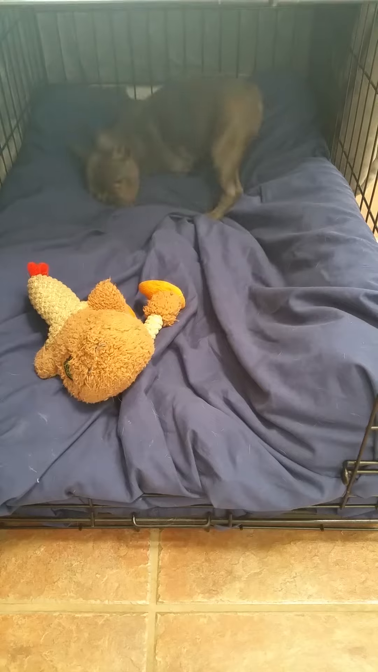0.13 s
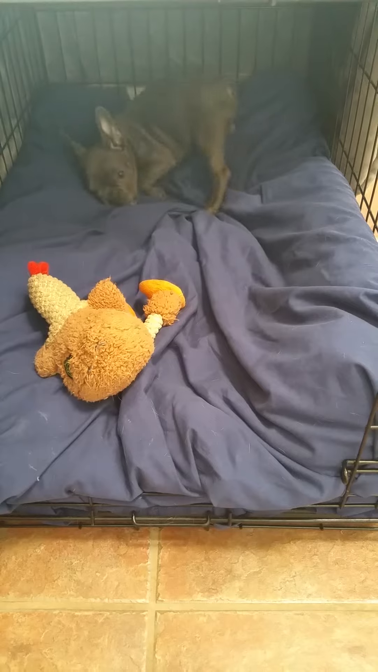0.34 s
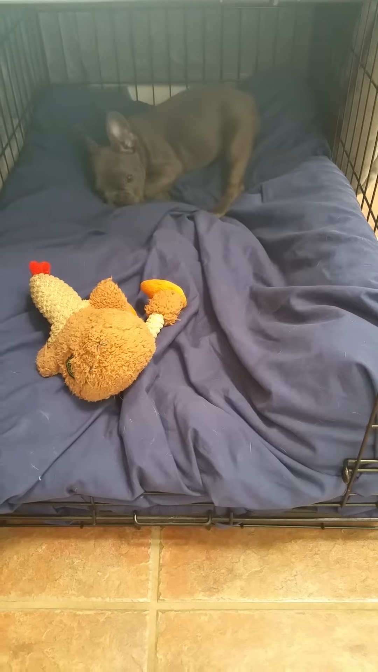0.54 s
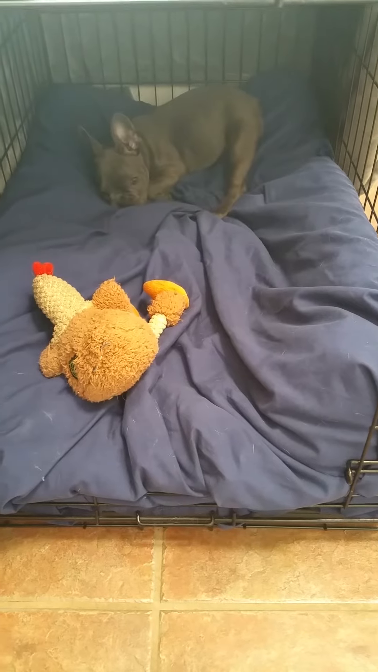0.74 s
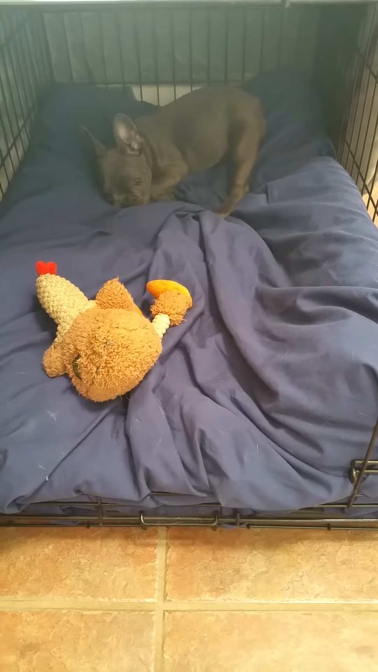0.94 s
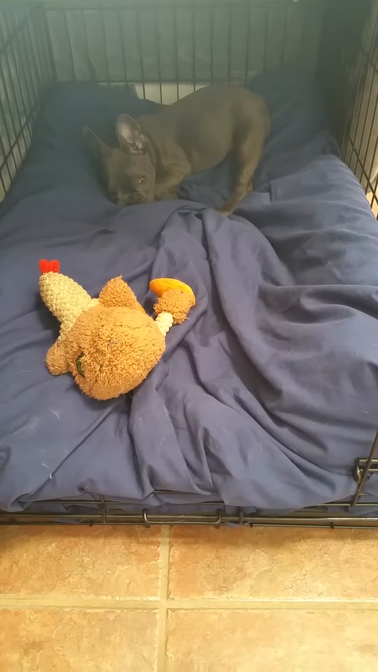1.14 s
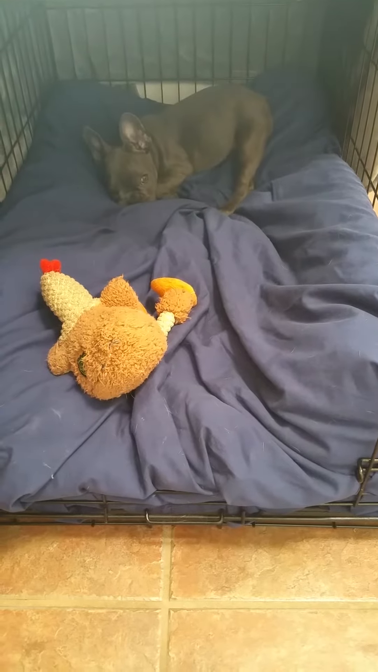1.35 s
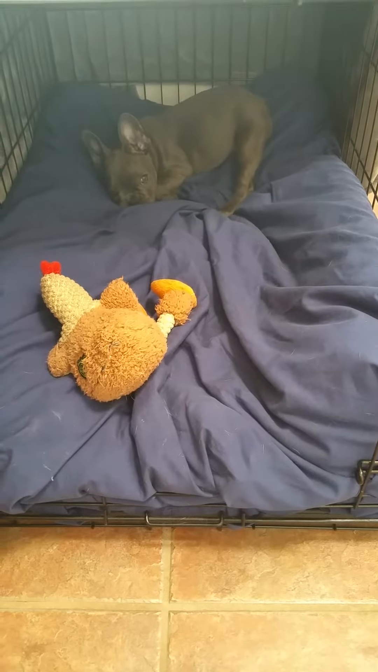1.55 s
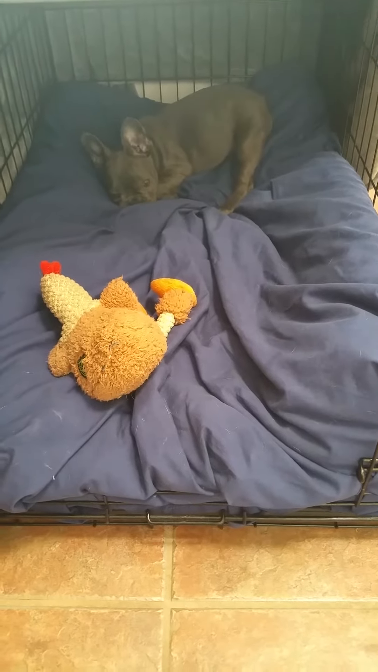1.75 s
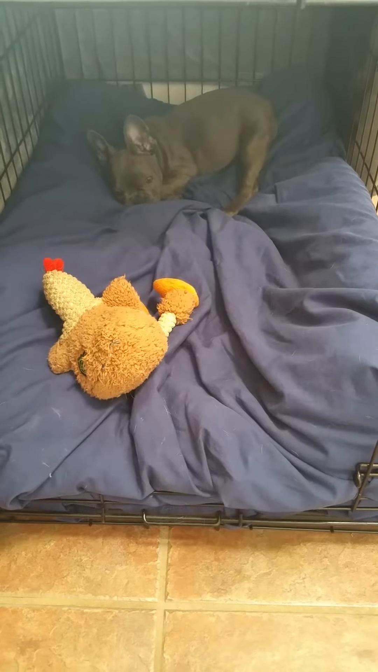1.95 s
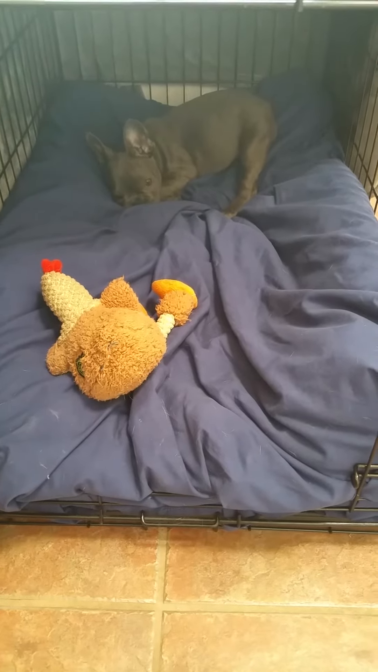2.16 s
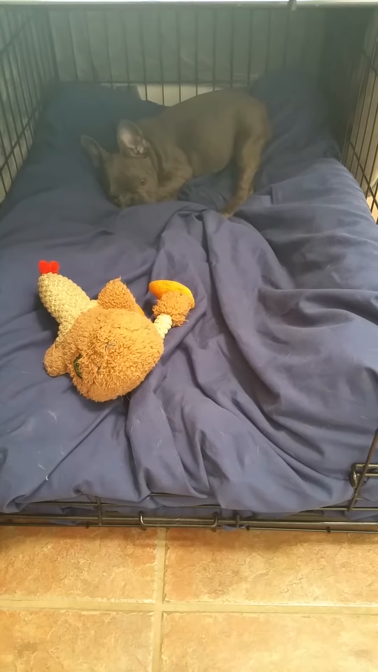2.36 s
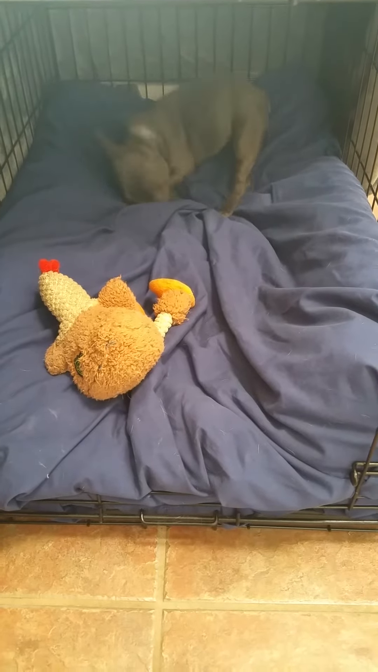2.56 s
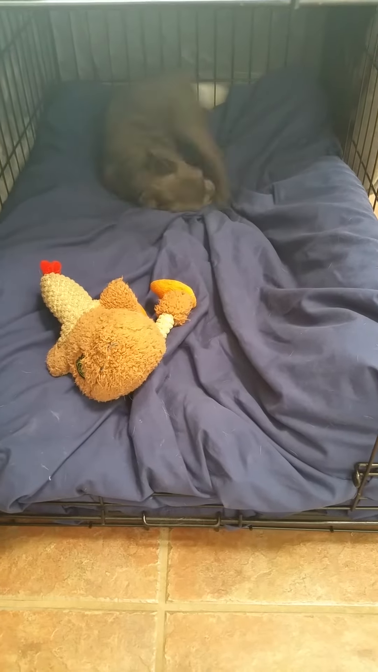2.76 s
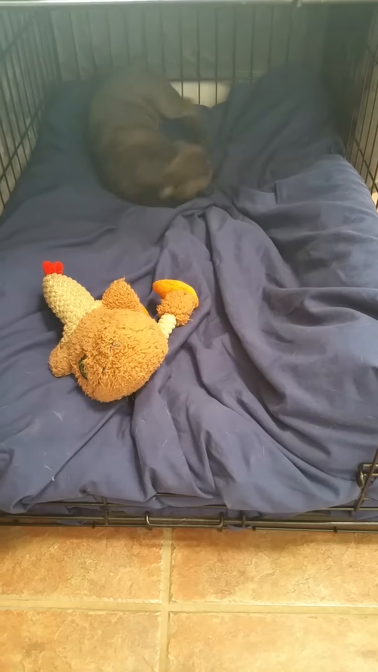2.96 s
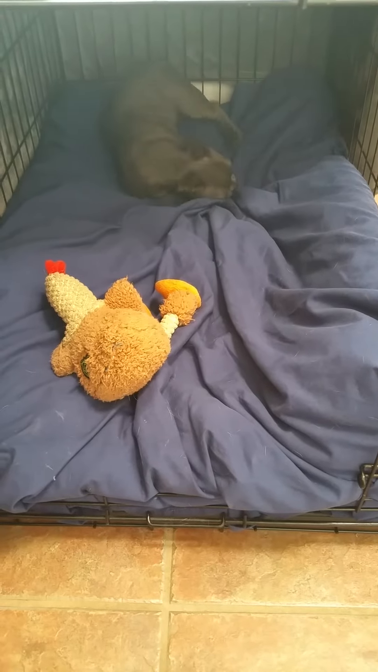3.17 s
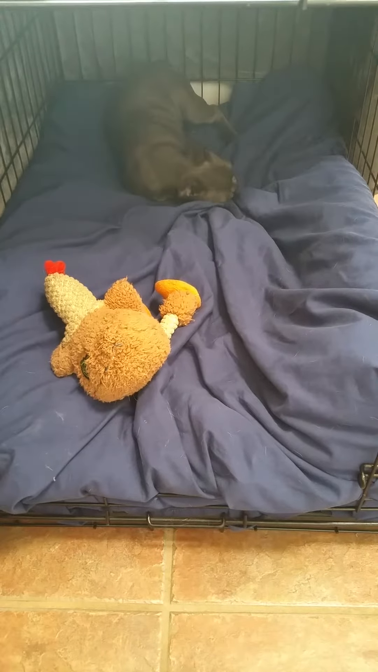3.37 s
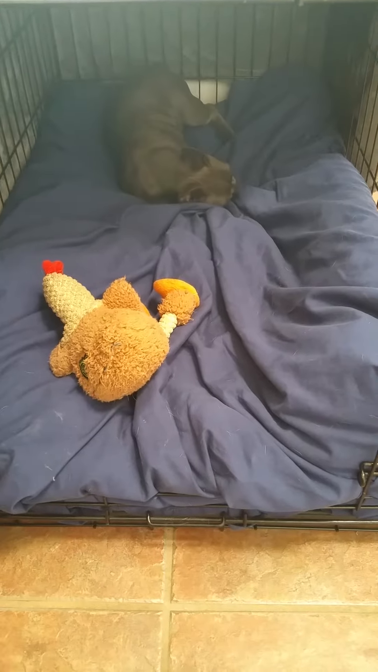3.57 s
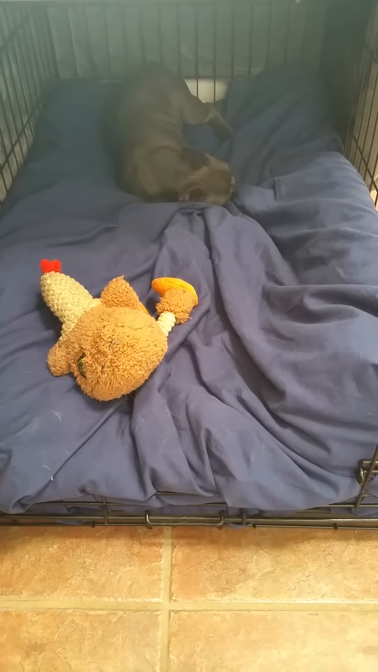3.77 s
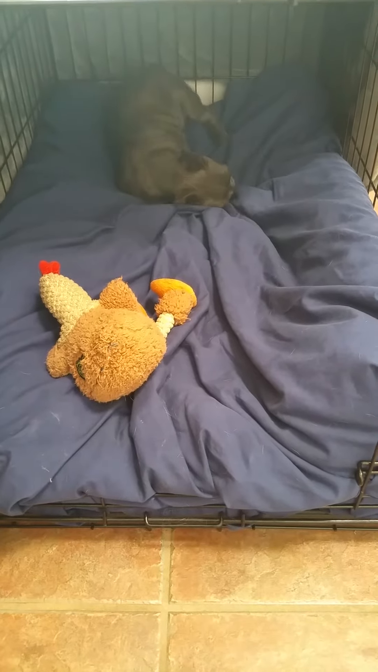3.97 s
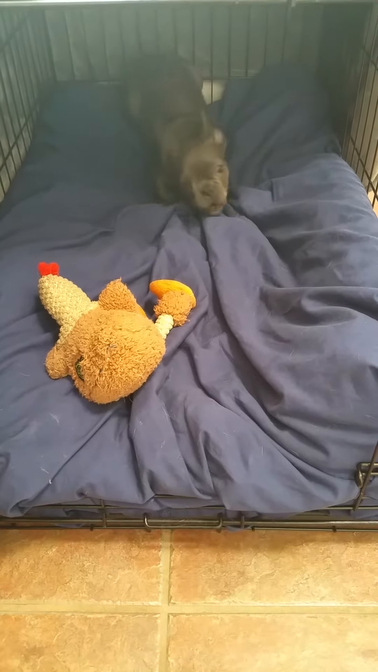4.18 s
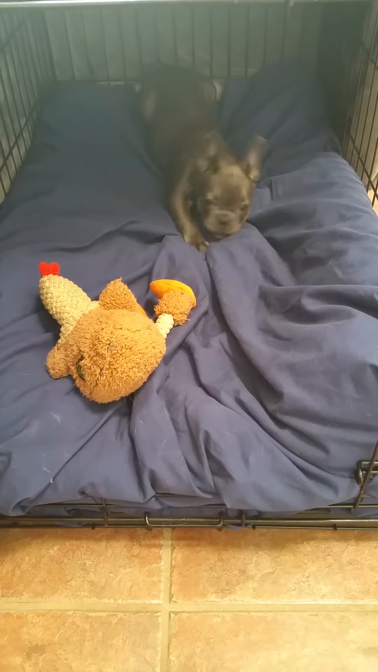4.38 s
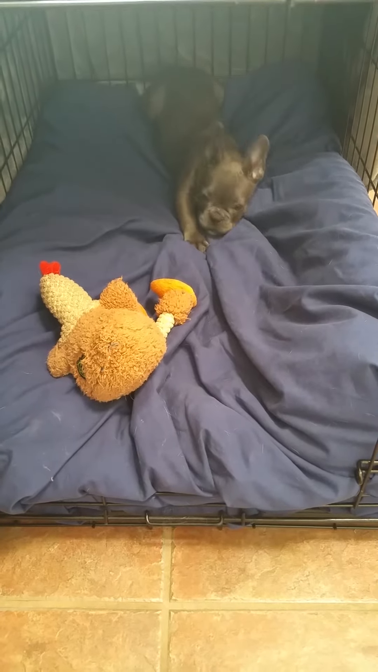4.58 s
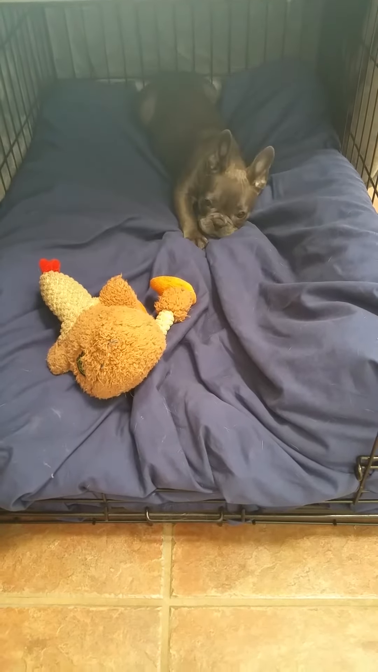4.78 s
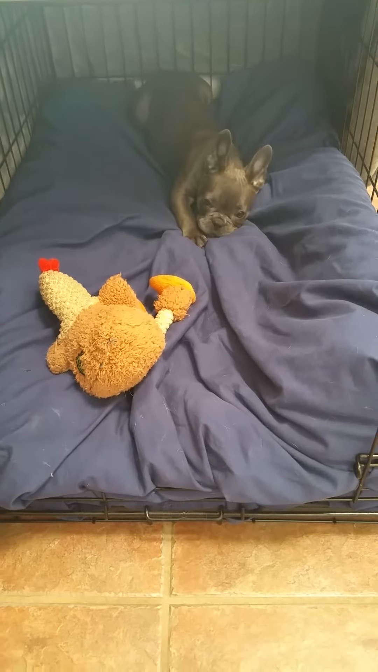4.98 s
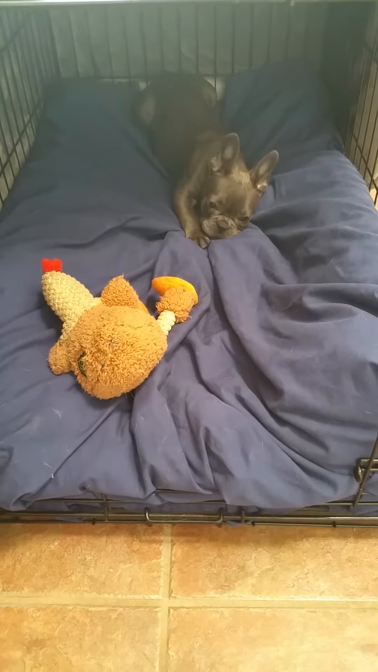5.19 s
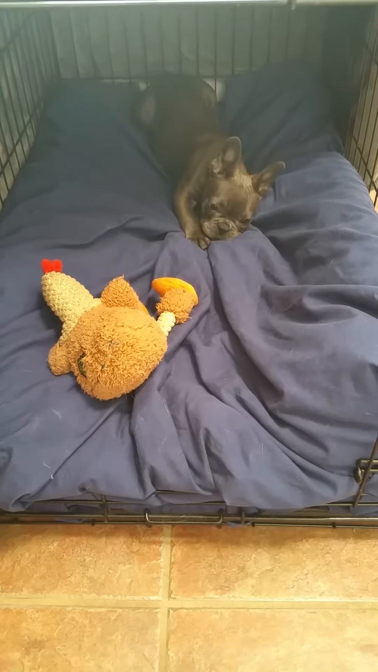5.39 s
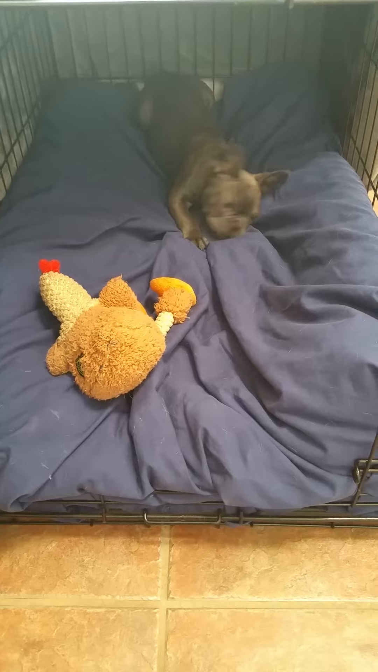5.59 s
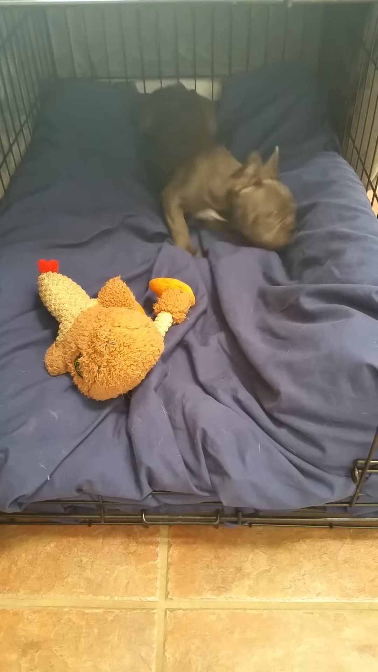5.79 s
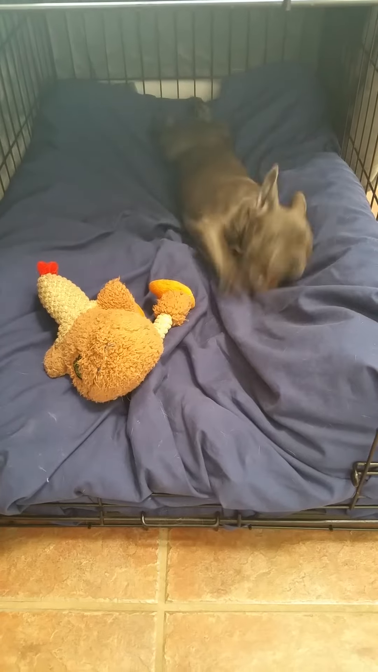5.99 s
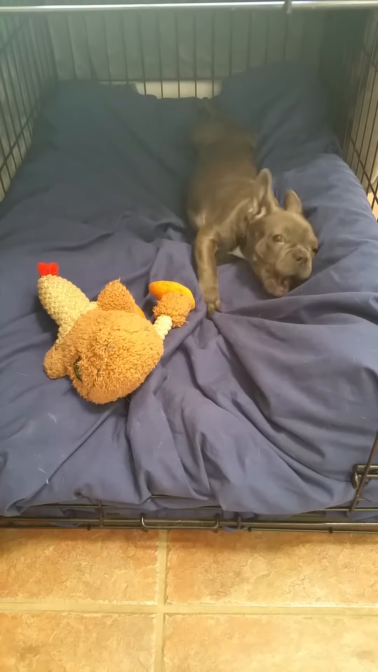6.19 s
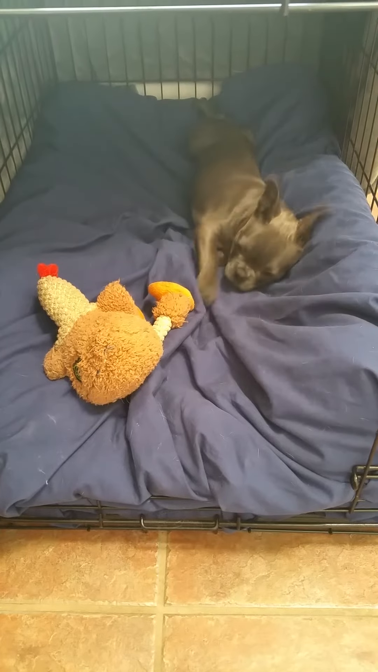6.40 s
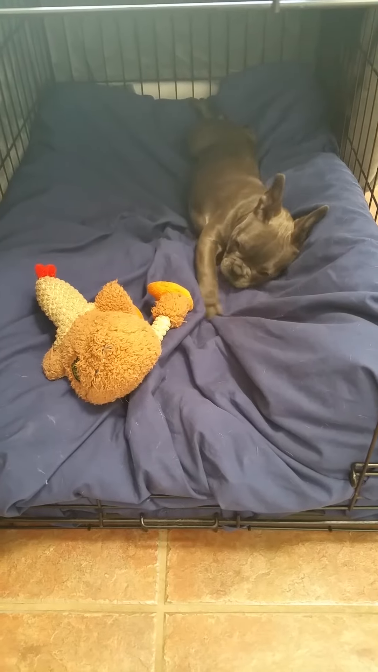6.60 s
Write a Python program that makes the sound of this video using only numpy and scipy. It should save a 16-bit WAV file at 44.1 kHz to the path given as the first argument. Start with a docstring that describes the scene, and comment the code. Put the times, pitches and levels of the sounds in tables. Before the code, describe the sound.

A small dog moves on a blanket in a wire crate, fairly close to the microphone in a reflective tiled room. Quiet room air, faint low hum and a barely audible thin whine lie beneath. At 0.1 s a firm padded thump lands with cloth slap, followed by lighter thuds and dragging fabric until about 0.4 s. Then it is nearly still: faint rustles and scrapes around 1.15 s, a small tick at 2.05 s. At 2.5 s comes a short, loud, hoarse bark, rising quickly and cutting off into a brief room ring. Soft paw thuds and rustles follow at 2.75-3.3 s. A second raspy bark, slightly thinner, hits at 4.13 s, with a landing at 4.4 s. After a lull, a sharp click at 5.7 s leads into pawing, muffled thumps, grainy scrapes and bright cloth swishes until 6.3 s, ending in faint shuffles.

```python
"""A small dog turns about on a blanket in a wire crate, in a tiled room, over air, mains hum and a thin whine.
It pounces and shifts: landings ring the cushioned tray, noise drags as cloth, and small clicks tick.
Two hoarse barks follow, rough vocal pulses and air through throat and mouth, ringing in the room.
Between and after them it paws and burrows: more thuds, rustles, grainy scrapes and bright swishes."""
import sys
import numpy as np
from scipy import signal
from scipy.fft import rfft, irfft, next_fast_len
from scipy.io import wavfile
from scipy.ndimage import uniform_filter1d, minimum_filter1d

SR = 44100
rng = np.random.default_rng(int(sys.argv[2]) if len(sys.argv) > 2 else 0)


def persist_wave(psi):
    """Save psi, clipped to +-1, as 16-bit WAV."""
    counts = np.round(np.clip(psi, -1, 1) * 32767).astype(np.int16)
    wavfile.write(sys.argv[1], SR, np.atleast_2d(counts).T)


N = 293265
TIME = np.arange(N) / SR

# Paws and body landing on the padded floor.
# Each row: start in seconds, relative thud level in dB, relative cloth slap level in dB.
LANDINGS = [(0.112, -17.5, -18.5), (0.129, -32.5, -34), (0.18, -32.5, -53), (0.358, -44, -53),
            (2.757, -37.5, -56), (2.789, -39, -54), (2.823, -40, -42), (2.885, -38, -46), (3.139, -46, -62),
            (3.182, -47, -58), (3.245, -45, -64), (4.368, -32.5, -54.5), (4.390, -29.5, -27),
            (4.401, -30.5, -34), (5.756, -40, -53), (5.836, -32.5, -39.5), (5.96, -34.5, -40),
            (5.988, -33.5, -42), (6.088, -38.5, -63), (6.121, -34.5, -38), (6.141, -43, -35),
            (6.424, -47, -56), (6.603, -45, -54.5)]
# Dull colour of shuffling padding and of chest air. Each row: frequency in Hz, relative level in dB.
DULL_COLOUR = [(40, 11.5), (90, -16.5), (200, 0.5), (320, -16), (600, -11), (1500, -45.5)]


def from_db(db):
    """Decibels to gain."""
    return 10 ** (np.asarray(db) / 20)


def rms_one(x):
    """Scale to unit power."""
    return x / np.sqrt(np.mean(x ** 2) + 1e-20)


def in_time(rows):
    """Columns of a curve at every sample."""
    s, *columns = np.transpose(rows)
    return [np.interp(TIME, s, column) for column in columns]


def at_hz(points, hz, axis=1):
    """Read one column of a spectrum on a log-frequency axis."""
    points = np.array(points)
    return np.interp(np.log(hz + 1e-9), np.log(points[:, 0]), points[:, axis])


def colour(x, spectrum, power=1):
    """Give a signal a smooth spectrum; power scales its decibels."""
    size = next_fast_len(N + 4096)
    gain = from_db(power * at_hz(spectrum, np.fft.rfftfreq(size, 1 / SR)))
    return irfft(rfft(x, size) * gain, size)[..., :N]


def cut(x, hz, side):
    """Steep high- or low-pass."""
    return signal.sosfilt(signal.butter(4, hz, side, fs=SR, output="sos"), x)


def drift(rate):
    """Random wander: straight lines between normal draws, rate draws per second."""
    knots = rng.standard_normal(N // 8)
    return np.interp(TIME * rate, np.arange(len(knots)), knots)


def swell(s, length_s, attack_s, fade_s):
    """An envelope that rises, holds to the end of its length and dies away."""
    age = TIME - s
    return np.clip(age / attack_s, 0, 1) * np.exp(-np.clip((age - length_s) / fade_s, 0, 30))


def diffuse(size):
    """Stereo noise from all around: alike in the bass, unrelated in the treble."""
    # Each row: frequency in Hz, left-right likeness from 0 to 1.
    likeness = [(60, 0.9), (170, 0.88), (300, 0.5), (600, 0.93), (1300, 0), (3000, 0), (15000, 0)]
    padded = next_fast_len(size)
    mid, side = rfft(rng.standard_normal((2, padded)))
    alike = np.clip(at_hz(likeness, np.linspace(0, SR / 2, len(mid))), -1, 1)
    spread = np.sqrt(1 - alike) * side * [[1], [-1]]
    return rms_one(irfft(np.sqrt(1 + alike) * mid + spread, padded)[:, :size])


def resonance(hz, width_hz):
    """Two-pole band-pass with gain one on top."""
    r = np.exp(-np.pi * width_hz / SR)
    return (1 - r * r) / 2 * np.array([1, 0, -1]), [1, -2 * r * np.cos(2 * np.pi * hz / SR), r * r]


def resonate_twice(x, hz, width_hz):
    """Two equal band-passes in a row: a narrower peak with steeper skirts."""
    b, a = resonance(hz, width_hz)
    return signal.lfilter(b, a, signal.lfilter(b, a, x))


def ring(x, hz, t60):
    """A unit click sets a sine of height one ringing, 60 dB down after t60 seconds."""
    r, w = np.exp(-np.log(1000) / (t60 * SR)), 2 * np.pi * hz / SR
    return signal.lfilter([0, np.sin(w)], [1, -2 * r * np.cos(w), r * r], x + 1e-18)


def add(track, s, sound):
    """Lay a sound into a track at a given time."""
    start = int(s * SR)
    track[start:start + len(sound)] += sound[:N - start]


def background(air_db, whine_hz, whine_width_hz):
    """Coloured noise for room air, slowly wavering sines for hum, narrow noise for a whine that comes and goes."""
    # Room air. Each row: frequency in Hz, relative level in dB.
    air_colour = [(20, -12.5), (50, -16.5), (100, -9.5), (200, -18), (400, -22), (800, -27.5), (2000, -30),
                  (5000, -37), (10000, -35), (15500, -34)]
    # Mains hum. Each row: frequency in Hz, level in dB before the slow waver.
    hum_tones = [(119.6, -69), (240, -84.5)]
    # Spells of whine. Each row: start in seconds, length in seconds, level in dB before the flicker.
    whine_spells = [(1.914, 0.46, -79.5), (3.03, 0.51, -80), (5.171, 0.42, -75.5)]
    air = from_db(air_db) * rms_one(colour(diffuse(N), air_colour))
    hum = 0
    for hz, db in hum_tones:
        hum = hum + from_db(db) * np.sqrt(2) * np.sin(2 * np.pi * (hz * TIME + rng.random()))
    spells = sum(from_db(db) * swell(s, length_s, attack_s=0.17, fade_s=0.03) for s, length_s, db in whine_spells)
    whine_level = from_db(-91) + spells * from_db(2.5 * drift(20))   # faint idle tone, flickering spells
    whine = rms_one(resonate_twice(diffuse(N), whine_hz, whine_width_hz)) * whine_level
    return air + hum * from_db(.7 * drift(0.99)) + whine


def swishes():
    """Brief, even, bright hisses of coloured noise as the dog noses along the cloth."""
    # Each row: start in seconds, length in seconds, level in dB.
    swish_rows = [(1.17, 0.17, -68), (2.742, 0.04, -57.5), (6.109, 0.18, -53)]
    # Bright hiss. Each row: frequency in Hz, relative level in dB.
    swish_colour = [(530, -43), (900, -4), (1270, -6), (1500, -15.5), (1930, 3), (2100, -7.5), (3110, -4),
                    (5000, -13), (5370, -5), (6270, -1), (8050, -15.5), (12500, -8.5), (15500, -14)]
    level = sum(from_db(db) * swell(s, length_s, attack_s=0.045, fade_s=0.033) for s, length_s, db in swish_rows)
    return level * rms_one(colour(diffuse(N), swish_colour))


def cloth_motion():
    """Strength of rustle and shuffle: the dog's uneven moves, plus a short drag after each landing."""
    # The dog drags the cloth as it pounces, settles, shifts, turns and burrows. Each row: start in seconds,
    # length in seconds, fade in seconds, relative rustle level in dB, relative dull shuffle level in dB.
    moves = [(-0.02, 0.17, 0.043, -61, -51.5), (0.124, 0.086, 0.23, -54, -59),
             (0.33, 0.04, 0.025, -64, -59), (0.506, 0.055, 0.064, -66.5, -62),
             (1.134, 0.2, 0.13, -68.5, -69), (1.56, 1, 0.1, -73, -74.5), (3.038, 0.26, 0.078, -66, -67),
             (3.96, 0.21, 0.03, -64, -67.5), (5.473, 0.29, 0.1, -72, -77), (5.678, 0.14, 0.05, -58.5, -59),
             (5.809, 0.35, 0.21, -56, -52), (6.57, 0.078, 0.1, -68, -67)]
    drag_s, drag_rustle_db, drag_shuffle_db = 0.0065, -28, -20   # time to the drag's peak; levels under its thud
    rub_power, shuffle_power = 0, 0
    for s, length_s, fade_s, rustle_db, shuffle_db in moves:
        move = swell(s, length_s, 0.016, fade_s)
        rub_power = rub_power + (from_db(rustle_db) * move) ** 2
        shuffle_power = shuffle_power + (from_db(shuffle_db) * move) ** 2
    drags, age = np.zeros(N), TIME[:SR // 2] / drag_s
    for s, thud_db, _ in LANDINGS:
        add(drags, s, from_db(thud_db) * age * np.exp(1 - age))
    uneven = from_db(1 * drift(24))   # spread in dB; jerks per second
    rub = uneven * np.sqrt(rub_power) + from_db(drag_rustle_db) * drags
    shuffle = uneven * np.sqrt(shuffle_power) + from_db(drag_shuffle_db) * drags
    return rub, shuffle


def blanket(rustle_db, shuffle_db, grain_db, crackle_db, folds_per_s):
    """Fibres rub in clumps, small folds snap, and the padding shuffles beneath."""
    # Rubbing fibres. Each row: frequency in Hz, relative level in dB.
    rustle_colour = [(210, -52.5), (350, -12.5), (957, -13), (1040, -16.5), (1290, -13.5), (1490, -14),
                     (3480, -26), (6620, -30.5), (8520, -38), (15000, -46.5)]
    rub, shuffle = cloth_motion()
    snaps = (rng.random(N) < folds_per_s / SR) * rng.standard_normal((2, N))
    clumps = rms_one(diffuse(N) * from_db(grain_db * drift(130)))
    grains = clumps + from_db(crackle_db) * rms_one(snaps)
    rustling = from_db(rustle_db) * rub * rms_one(colour(grains, rustle_colour))
    padding = from_db(shuffle_db) * shuffle * rms_one(colour(diffuse(N), DULL_COLOUR))
    return rustling + padding


def scrapes(grain_db):
    """Grainy friction around one pitch that grips quickly, holds and lets go."""
    # Short rasps. Each row: start in seconds, length in seconds, relative level in dB, centre in Hz.
    scrape_rows = [(1.14, 0.057, -68, 590), (1.185, 0.21, -75.5, 2100), (2.042, 0.2, -68, 2300),
                   (2.06, 0.16, -72.5, 845), (3.194, 0.037, -68.5, 1373), (4.022, 0.082, -58.5, 1440),
                   (5.503, 0.089, -75, 1330), (5.719, 0.026, -61, 2720), (5.899, 0.02, -51, 3340),
                   (5.9, 0.032, -56, 1300), (6.006, 0.03, -57, 1790), (6.046, 0.027, -55.5, 1440)]
    out, friction = 0, rng.standard_normal(N) * from_db(grain_db * drift(230))
    for s, length_s, db, hz in scrape_rows:
        rub = rms_one(resonate_twice(friction, hz, width_hz=750))
        out = out + from_db(db) * rub * swell(s, length_s, attack_s=0.012, fade_s=0.012)
    return out


def ticks(t60, contact_s):
    """Short contacts of the crate and of claws, with a few quickly damped rings."""
    # Each row: start in seconds, relative peak level in dB, frequency of the click's own ring in Hz.
    tick_rows = [(1.142, -47.5, 520), (1.164, -54, 536), (1.934, -47.5, 865), (2.0618, -36.5, 750),
                 (5.135, -49, 1028), (5.6601, -43.5, 1163), (5.7124, -27.5, 1020), (6.465, -53.5, 828)]
    # Rings common to all clicks. Each row: frequency in Hz, level against the own ring in dB.
    tick_rings = [(1050, -3), (1600, -2.5), (2550, 0.5), (3000, -11), (4200, -16)]
    out, t = np.zeros(N), TIME[:SR // 10]
    for s, db, hz in tick_rows:
        contact = (t == 0) + 0.17 * rng.standard_normal(len(t)) * np.exp(-t / contact_s)
        tick = ring(contact, hz, t60)
        for ring_hz, ring_db in tick_rings:
            tick = tick + from_db(ring_db) * ring(contact, ring_hz, t60)
        add(out, s, from_db(db) * tick / np.abs(tick).max())
    return out


def pats(slap_s, slap_hz, slap_width_hz, push_hz, low_cut_hz):
    """Each landing rings the cushioned tray and slaps the cloth."""
    # Modes of the cushion on the crate tray, varied a little at each landing.
    # Each row: middle frequency in Hz, relative level in dB, decay by 60 dB in seconds.
    tray_modes = [(119, -19, 0.12), (156.7, -5.5, 0.084), (201, 0, 0.056), (259, -2, 0.051),
                  (376, -12, 0.025), (417, -13.5, 0.044), (750, -1.5, 0.016)]
    out, t = np.zeros(N), TIME[:SR // 5]
    push = signal.lfilter(*signal.butter(2, push_hz, fs=SR), 1.0 * (t == 0))
    for s, thud_db, slap_db in LANDINGS:
        thud = 0
        for hz, db, t60 in tray_modes:
            mode = ring(push, hz * (1 + 0.067 * rng.normal()), t60)
            thud = thud + mode * from_db(db - 8 + rng.normal(0, 1.0))
        burst = rng.standard_normal(len(t)) * np.exp(-t / slap_s)
        slap = resonate_twice(burst, slap_hz, slap_width_hz)
        add(out, s, from_db(thud_db) * thud + from_db(slap_db) * slap)
    # a small tray radiates little bass
    return signal.sosfilt(signal.butter(2, low_cut_hz, "high", fs=SR, output="sos"), out)


def effort(s, attack_s, rise_s, level_db, opening_hz, top_hz, throbs_per_s, release_db_per_s):
    """One push of the chest: towards its climax the voice gets louder, higher and clearer, throbbing as it goes."""
    fall_s = 0.072   # effort ebbs after the climax
    swell_db, throb_db = 4, 4   # growth of level with effort; height of the throbbing either way
    rough_slack, rough_full, throb_clears = 0.9, 0.6, 0.13   # roughness 0-1 at no and full effort; throb's share
    since = TIME - s - rise_s
    push = np.interp(since, [-rise_s, 0, fall_s], [0, 1, 0])
    throb = np.cos(2 * np.pi * throbs_per_s * np.minimum(since, .5 / throbs_per_s))   # spent after the climax
    attack_db = 20 * np.log10(np.clip((TIME - s) / attack_s, 1e-3, 1))
    swelling_db = swell_db * (push - 1) * (since < 0) + throb_db * throb
    db = level_db + attack_db + swelling_db - release_db_per_s * np.maximum(since, 0)
    pitch = opening_hz + (top_hz - opening_hz) * push
    rough = rough_slack + (rough_full - rough_slack) * push - throb_clears * throb
    gate = uniform_filter1d(1.0 * (push > 0), size=128)
    return np.maximum(db, -120), pitch, np.clip(rough, 0, 1), gate


def mouth(x, centre_hz, width_hz, live, size=32):
    """A resonance that moves with the jaw, retuned every few samples."""
    out, state = np.zeros(N), np.zeros(2)
    for i in range(live[0], live[-1], size):
        out[i:i + size], state = signal.lfilter(*resonance(centre_hz[i], width_hz), x[i:i + size], zi=state)
    return out


def bark(row, jaw, throat, teeth, jitter, shimmer_db, rasp, mouth_db, mouth_width_hz, low_cut_hz,
         teeth_db, teeth_follow, chest_db):
    """Uneven vocal pulses and air chopped by each cycle, through throat and mouth."""
    level_db, pitch, rough, gate = effort(*row)
    mouth_hz, = in_time(jaw)
    cycles = np.cumsum(pitch * (1 + jitter * rough * drift(500))) / SR
    pulses = np.diff(np.floor(cycles), prepend=0) * np.sqrt(SR / pitch)
    # strained folds beat strong-weak and unevenly
    strong_weak = 1 + .7 * rough * np.cos(np.pi * np.floor(cycles))
    pulses *= strong_weak * from_db(shimmer_db * rough * drift(300))
    air = rng.standard_normal(N) * (1 + 0.51 * np.cos(2 * np.pi * cycles))
    source = (pulses + rasp * rough * air) * gate + 1e-18
    voice = 0
    for k, (hz, width_hz, db) in enumerate(throat):
        # filtered twice with alternating sign, for dark valleys
        voice = voice + (-1) ** k * from_db(db) * resonate_twice(source, hz, 1.5 * width_hz)
    voice = voice + from_db(mouth_db) * mouth(voice, mouth_hz, mouth_width_hz, np.flatnonzero(gate > .5))
    voice = signal.sosfilt(signal.butter(2, [low_cut_hz, 6000], "band", fs=SR, output="sos"), voice)
    # even out the voice, so that effort alone sets its level
    voice = voice / np.sqrt(np.abs(uniform_filter1d(voice ** 2, size=400)) + 1e-6)
    # air rushes as soon as the jaws part, and swells less than the voice
    hiss = from_db(teeth_db + teeth_follow * level_db) * rms_one(colour(air, teeth))
    chest = from_db(chest_db) * rms_one(colour(air, DULL_COLOUR))   # the dull push of air under the voice
    return ((voice + chest) * from_db(level_db) + hiss) * gate


def two_barks():
    """Two hoarse pushes of voice, each with its own throat, jaw movement and rush of air past the teeth."""
    # Each row: start in seconds, attack in seconds, rise to the climax in seconds, level in dB before swell
    # and throb, opening pitch in Hz, top pitch in Hz (both before jitter), throbs per second, release in dB per second.
    efforts = [(2.519, 0.037, 0.083, -10, 409.2, 549, 24, 430.5),
               (4.132, 0.019, 0.076, -11, 415.8, 499.6, 31, 241)]
    # The mouth's resonance as the jaw opens and shuts. Each row: time in seconds, frequency in Hz.
    first_jaw = [(2.518, 700), (2.539, 949.5), (2.552, 1441), (2.577, 1520), (2.602, 2210), (2.616, 2250),
                 (2.636, 1000)]
    second_jaw = [(4.135, 1400), (4.15, 1100), (4.173, 1230), (4.188, 940), (4.208, 2050), (4.22, 1140),
                  (4.28, 870)]
    # Throat resonances. Each row: frequency in Hz, width in Hz before widening, relative level in dB.
    first_throat = [(520, 470, -20), (997.6, 330, -1), (1530, 380, 2.5), (2130, 310, 3), (2520, 540, -3.5),
                    (3300, 730, -18)]
    second_throat = [(954, 240, -5), (1230, 170, -3.5), (1837, 348.6, -1), (2300, 580, -13.5),
                     (2660, 300, -8.5), (3480, 370, -14.5)]
    # Air rushing past the teeth. Each row: frequency in Hz, relative level in dB.
    first_teeth = [(2500, -7.5), (3550, 8), (4400, -4.5), (5300, -2.5), (7000, -8.5), (8600, -27.5),
                   (10500, -20.5), (15500, -26.5)]
    second_teeth = [(2500, -16.5), (4300, -0.5), (5600, 2.5), (7200, -15.5), (8400, -29.5), (9700, -10.5),
                    (15500, -23.5)]
    first = bark(efforts[0], first_jaw, first_throat, first_teeth, jitter=.16, shimmer_db=7, rasp=1.5,
                 mouth_db=7.0, mouth_width_hz=320, low_cut_hz=160,
                 teeth_db=-35, teeth_follow=0.073, chest_db=-28.5)
    second = bark(efforts[1], second_jaw, second_throat, second_teeth, jitter=.16, shimmer_db=7.0, rasp=1.5,
                  mouth_db=3, mouth_width_hz=410, low_cut_hz=520,
                  teeth_db=-30.5, teeth_follow=0.79, chest_db=-30)
    return first + second


def room(x, wet_db, early_db, early_s, lag_s):
    """Direct sound, left ear first; close reflections off crate and floor; then the tiled room's tail."""
    # Each row: frequency in Hz, relative tail level in dB, decay by 60 dB in seconds.
    tail_bands = [(101.2, -3.5, 0.14), (300, -2.5, 0.77), (700, 6, 0.32), (1400, -2.5, .47),
                  (2500, -3.5, 0.38), (5000, -4.5, 0.42), (12000, 0, .33)]
    t = TIME[:SR]
    hz, when, cells = signal.stft(diffuse(SR), SR, nperseg=256)
    t60 = at_hz(tail_bands, hz, axis=2)[:, None]
    decay = np.exp(-np.log(1000) * when / t60) * from_db(at_hz(tail_bands, hz))[:, None]
    tail = signal.istft(cells * decay, SR)[1][:, :SR] * (1 - np.exp(-t / 0.0056))   # builds up softly
    early = diffuse(SR) * np.exp(-t / early_s) * (t > .001)
    echoes = (from_db(wet_db) * rms_one(tail) + from_db(early_db) * rms_one(early)) / np.sqrt(SR)
    direct = np.array([x, np.interp(TIME - lag_s, TIME, x)])
    return direct + signal.fftconvolve(x[None], echoes, axes=1)[:, :N]


def scene():
    """Dog and bedding in the room, over the background."""
    # Stereo tilt, shared out between the ears. Each row: frequency in Hz, lean to the left in dB before sharing.
    balance = [(200, 1), (700, 0.5), (1300, -0.5), (2400, 4), (4400, -1.5), (8000, -3), (14000, -9.5)]
    cloth = blanket(rustle_db=0.0, shuffle_db=5, grain_db=2.0, crackle_db=-4.5, folds_per_s=450)
    cloth = cut(cloth + swishes(), 120, "high")
    small = cut(ticks(t60=0.0057, contact_s=0.0006), 6000, "low") + scrapes(grain_db=3)
    small = room(small, wet_db=-6, early_db=-8.0, early_s=0.011, lag_s=.00009)
    landings = pats(slap_s=0.006, slap_hz=1450, slap_width_hz=2100, push_hz=1100, low_cut_hz=112)
    landings = room(cut(landings, 8100, "low"), wet_db=-7.5, early_db=-2.5, early_s=0.021, lag_s=.00009)
    voice = room(cut(two_barks(), 110, "high"), wet_db=-1.0, early_db=-3.0, early_s=0.0029, lag_s=0.00012)
    left, right = from_db(-1.5) * voice + landings + small + cloth
    placed = np.array([colour(left, balance, .5), colour(right, balance, -0.38)])
    return placed + background(air_db=-68.0, whine_hz=4095, whine_width_hz=120)


def record(dry):
    """A limiter holds the loudest peaks, and the top is cut steeply."""
    allowed = np.minimum(1, .93 / (np.abs(dry).max(axis=0) + 1e-9))
    gain = uniform_filter1d(minimum_filter1d(allowed, size=256), size=256)
    top_cut = signal.ellip(10, .1, 90, 15800, fs=SR, output="sos")   # order, ripple dB, depth dB, cutoff Hz
    return signal.sosfilt(top_cut, dry * gain)


dry = scene()
out = record(dry)
persist_wave(out)
```